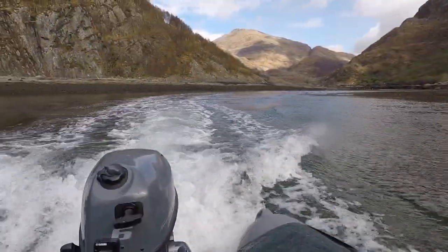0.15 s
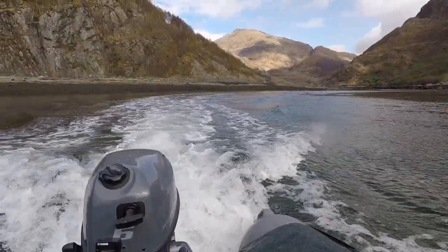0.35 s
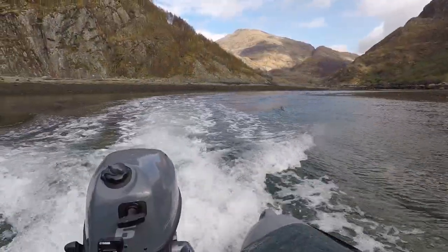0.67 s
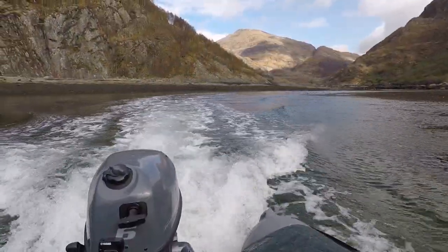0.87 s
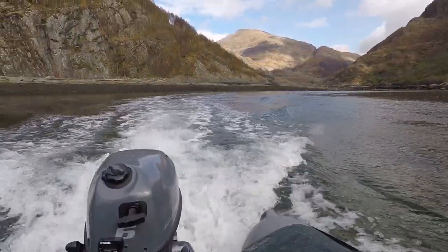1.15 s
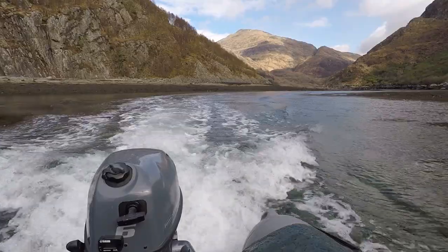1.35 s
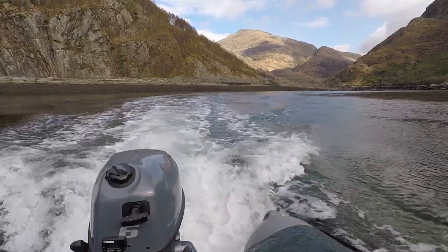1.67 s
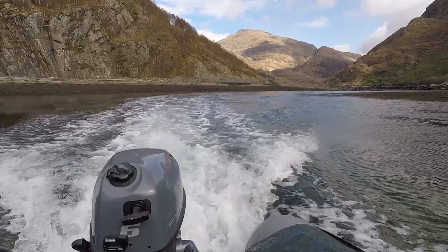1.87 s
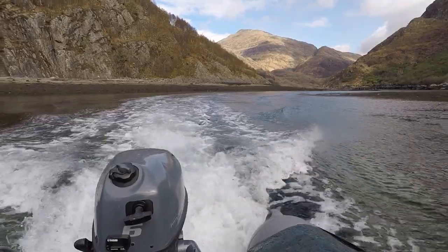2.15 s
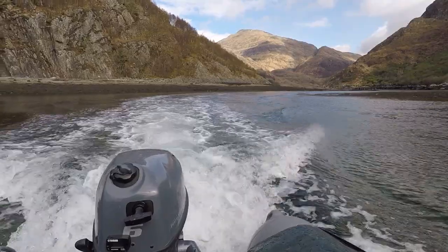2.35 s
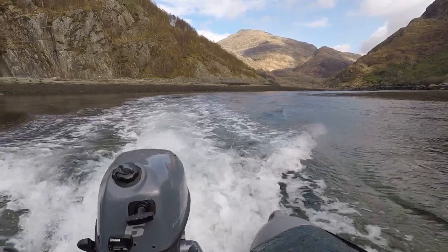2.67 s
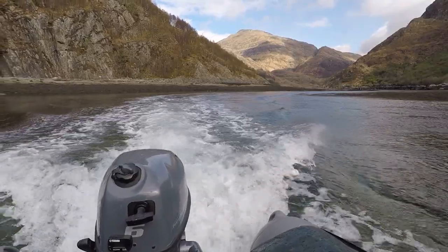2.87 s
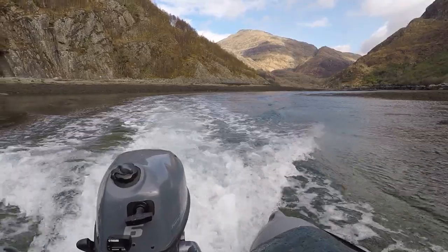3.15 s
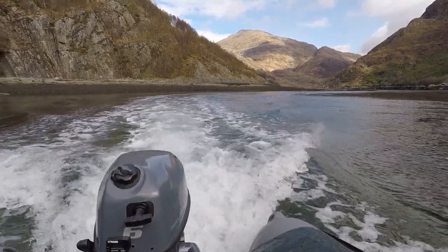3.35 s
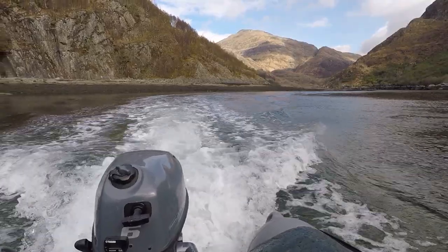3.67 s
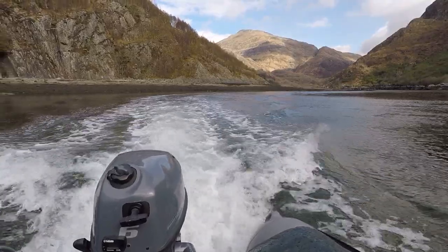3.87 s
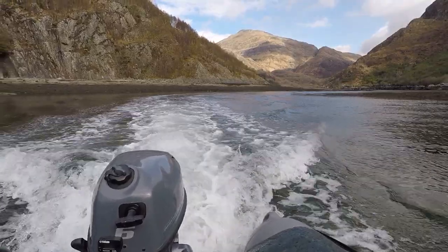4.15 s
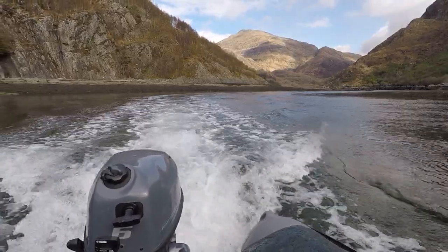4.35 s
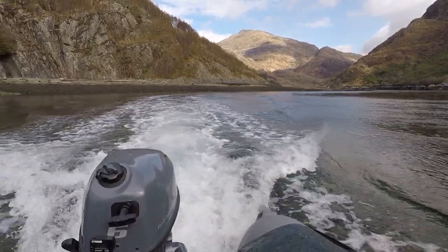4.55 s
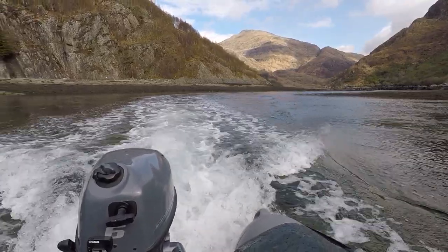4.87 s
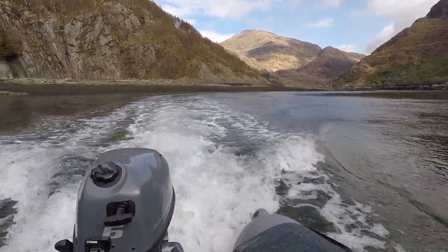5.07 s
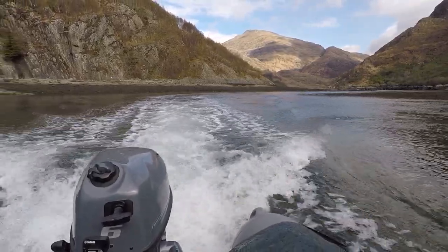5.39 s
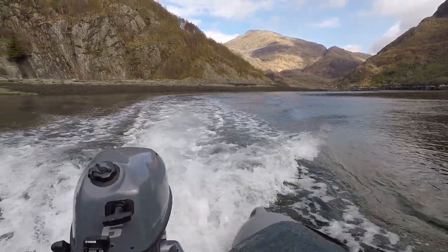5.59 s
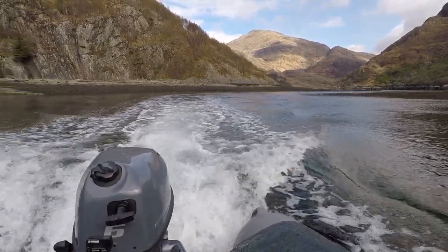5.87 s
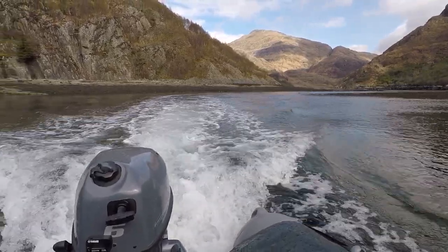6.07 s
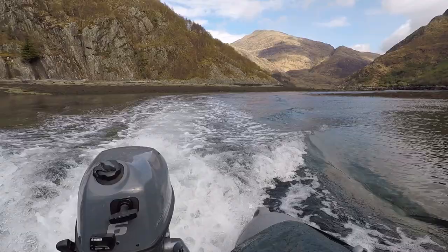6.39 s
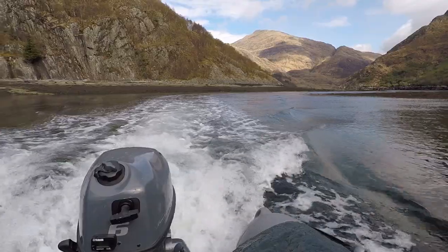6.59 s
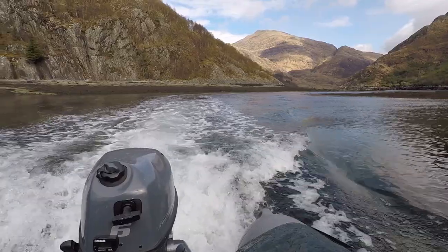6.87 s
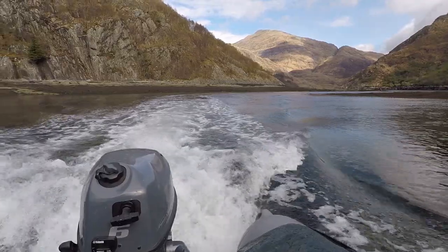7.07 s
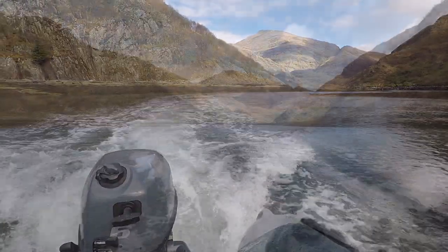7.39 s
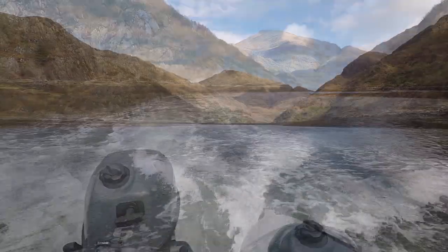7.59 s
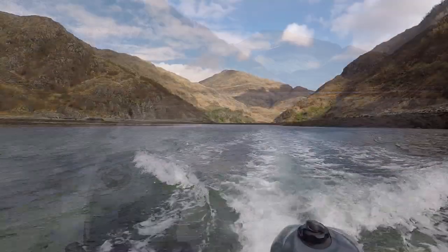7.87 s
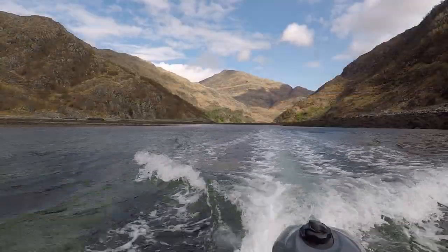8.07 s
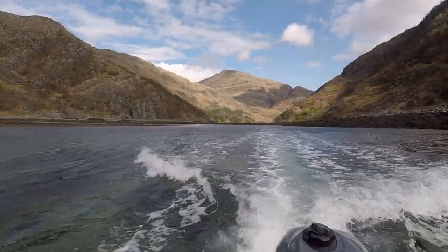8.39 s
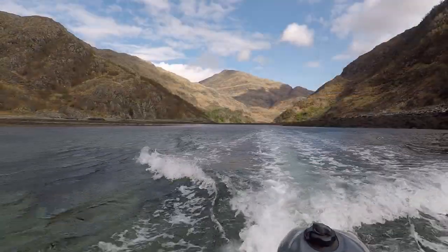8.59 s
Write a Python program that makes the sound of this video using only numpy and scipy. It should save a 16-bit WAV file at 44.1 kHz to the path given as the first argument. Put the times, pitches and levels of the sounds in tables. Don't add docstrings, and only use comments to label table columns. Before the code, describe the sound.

A small outboard motor drones steadily with a deep, rapid thump and cowl rattle over hissing wake, then blends into a faster, windier stretch.

```python
import sys
import numpy as np
from scipy import signal
from scipy.fft import rfft, irfft, next_fast_len
from scipy.io import wavfile
from scipy.ndimage import uniform_filter1d, minimum_filter1d

SR = 44100
rng = np.random.default_rng(int(sys.argv[2]) if len(sys.argv) > 2 else 0)


def log_audio(samples):
    frames = np.atleast_2d(samples).T
    limited = np.clip(frames, -1, 1)
    pcm = np.round(limited * 32767).astype(np.int16)
    wavfile.write(sys.argv[1], SR, pcm)


def invert_db(level):
    return 10 ** (np.asarray(level, dtype=float) / 20)


N = 385434


def noise():
    return rng.standard_normal(N)


def unit(x):
    return x / np.sqrt(np.mean(x ** 2))


def colour(x, spectrum):
    hz, db = np.transpose(spectrum)
    size = next_fast_len(N)
    log_hz = np.log(np.arange(size // 2 + 1) * SR / size + 1)
    gain = invert_db(np.interp(log_hz, np.log(hz), db))
    return unit(irfft(rfft(x, size) * gain, size)[:N])


def band(x, hz, width_hz):
    edges = np.clip([hz - width_hz / 2, hz + width_hz / 2], 2, SR / 2 - 100)
    return unit(signal.sosfilt(signal.butter(2, edges, "band", fs=SR, output="sos"), x))


def walk(rate):
    hold = int(SR / rate)
    held = np.repeat(rng.standard_normal(400), hold)[:N]
    return unit(uniform_filter1d(uniform_filter1d(held, hold), hold))


# t/s, hold/s, small eddies level/dB, large eddies level/dB
GUSTS = [(0.083, 0.35, -23, -15), (0.93, 0.37, -43, -26), (1.55, .22, -26, -15.5),
         (1.917, 0.21, -27, -16.5), (3.353, 0.61, -31, -18), (5.8, 0.42, -50, -19.5),
         (6.101, .7, -31.5, -22), (7.472, 0.071, -23.5, -15), (7.66, .14, -20, -17), (8.17, 0.25, -19, -20),
         (8.5, .3, -21, -15)]


def airflow(share):
    t = np.arange(N) / SR
    breeze_db, faster_breeze_db = [-32.5, -22], [-26, -18]
    rise_s, fall_s = 0.037, 0.1
    power = np.outer(invert_db(breeze_db), np.cos(share)) ** 2
    power = power + np.outer(invert_db(faster_breeze_db), np.sin(share)) ** 2
    for start, hold, small_db, large_db in GUSTS:
        corners = np.cumsum([-rise_s, rise_s, hold, fall_s])
        gust = np.interp(t - start, corners, [0, 1, 1, 0])
        power = power + np.outer([invert_db(small_db), invert_db(large_db)], gust) ** 2
    return np.sqrt(power)


# f/Hz, level/dB
BUFFET_TONE = [(60, -29), (120, -2.5), (170, -1.5), (230, -3), (300, -5), (400, -11.5), (470, -18.5),
               (570, -40), (800, -24.5), (1100, -41.5), (1500, -51), (2500, -70)]
# f/Hz, level/dB
RUMBLE_TONE = [(5, -40), (14, 0.5), (26, -1.5), (50, -3.5), (80, -6), (130, -9), (190, -14), (280, -29.5),
               (500, -80)]


def wind(share):
    small, large = airflow(share)
    buffet = colour(invert_db(1.5 * walk(30)) * noise(), BUFFET_TONE)
    rumble = colour(invert_db(1.8 * walk(7.4)) * noise(), RUMBLE_TONE)
    return small * buffet + large * rumble


# t/s, peak level/dB
SLAPS = [
    (7.47, -28),
    (7.9, -27),
    (7.764, -24),
    (8.303, -22),
    (8.389, -29),
    (8.439, -24),
]


def slaps():
    start, peak_db = np.array(SLAPS).T
    rise_s, decay_s = 0.0033, 0.013
    since = np.arange(N) / SR - start[:, None]
    shape = np.clip(since / rise_s, 0, 1) * np.exp(-np.clip(since, 0, 1) / decay_s)
    return (invert_db(peak_db - 7) @ shape) * band(noise(), 800, 330)


def wake(spectrum, patchy_db):
    lands = rng.random(N) < 900 / SR
    drops = lands * rng.standard_normal(N) * invert_db(2.2 * rng.exponential(size=N))
    foam, swell = 0, walk(5.5)
    for hz in 2200 * 2 ** np.arange(0, 3, 1 / 3):
        patch = band(noise(), hz, hz / 4) * np.sqrt(hz / 2200)
        foam = foam + patch * invert_db(patchy_db * walk(11) + .5 * patchy_db * swell)
    return colour(unit(foam) + invert_db(-17) * unit(drops), spectrum)


def ticks(cycle, table):
    out = 0
    for place, hz, width_hz, db in table:
        since = cycle - place
        strength = invert_db(1.5 * rng.standard_normal(400))[np.floor(since).astype(int) + 1]
        blow = strength * np.exp(-(since % 1) / .07)
        out = out + invert_db(db) * band(blow * noise(), hz, width_hz)
    return out


# f/Hz, width/Hz, depth of slow swell (0-1)
COWL_PANELS = [
    (820, 81, 0.3),
    (1490, 390, 0.27),
    (1910, 350, 0.11),
]


def clatter(cycle, spectrum, fresh, throb_db):
    steps, lowest_order = 256, 28
    order = np.arange(steps // 2 + 1)
    phases = np.exp(2j * np.pi * rng.random((2, len(order))))
    patterns = irfft(phases * (order > lowest_order), steps)
    place = cycle % 1 * steps
    first, second = (unit(np.interp(place, np.arange(steps), p, period=steps)) for p in patterns)
    turn = 0.59 * walk(3)
    pattern = np.cos(turn) * first + np.sin(turn) * second
    once, twice = np.cos(2 * np.pi * (cycle - .3)), np.cos(4 * np.pi * (cycle - .35))
    throb = invert_db(throb_db * (once + twice))
    rattle = colour(0.081 * pattern + fresh * throb * noise(), spectrum)
    panels = 0
    for hz, width_hz, depth in COWL_PANELS:
        panels = panels + depth * walk(1.625) * band(rattle, hz, width_hz) / 2
    return rattle + panels


def thump(cycle, orders, pulse, wobble_db):
    lead, turn, spread = pulse
    cowl_start = .75 * rng.random(50) - .38 * np.arange(50)
    out = 0
    for k, db in orders:
        if k < 15:
            start = turn - spread * (k - 8) ** 2 / 2 + (lead * k if k < 3 else 0)
        else:
            start = cowl_start[int(k)]
        loose = 5 if k == 1 else .6 if k < 5 else 1.2 if k < 15 else 1.5
        path = -.1 * (k == 1) - .085 * np.cos(2 * np.pi * k / 3 + .35) * (4 < k < 15)
        wander = path + .001 * k * walk(4)
        wobble = loose * (wobble_db * 1.25 * np.tanh(walk(5)) - .5) + .5
        out = out + invert_db(db + wobble) * np.cos(2 * np.pi * (k * cycle + start + wander))
    return np.sqrt(2) * out


def outboard(run, levels_db, orders, pulse, cowl, foam, valves, fresh):
    t, rate = np.transpose(run)
    hz = np.interp(np.arange(N) / SR, t, rate)
    thump_db, cowl_db, wake_db = levels_db
    labour_db = 3 * (hz - hz.mean())
    cycle = np.cumsum(hz * (1 + .001 * walk(9))) / SR
    body = invert_db(thump_db) * thump(cycle, orders, pulse, wobble_db=1.06)
    rattle = invert_db(cowl_db + labour_db) * clatter(cycle, cowl, fresh, throb_db=2.0)
    water = invert_db(wake_db) * (wake(foam, patchy_db=0.74) + ticks(cycle, valves))
    return body + rattle + water


# t/s, f/Hz
CRUISE_RUN = [(0.0, 36.18), (0.41, 36.06), (1.02, 36.2), (1.48, 36.2), (1.77, 35.6), (2.38, 36.2),
              (4.09, 36.27), (4.15, 35.98), (5.65, 36.15), (6.04, 35.58), (6.63, 36.2), (7.3, 36.15)]
# multiple of firing rate, level/dB
CRUISE_ORDERS = [(1, -8), (2, 0), (3, -5), (4, -2), (5, -17), (6, -7), (7, -14), (8, -13), (9, -13),
                 (10, -21), (11, -23), (12, -25), (13, -28), (14, -36), (15, -55), (16, -55), (17, -50),
                 (18, -47), (19, -45), (20, -40), (21, -32), (22, -31), (23, -40), (24, -35), (25, -39),
                 (26, -42), (27, -43), (28, -46), (36, -39), (44, -39)]
# f/Hz, level/dB (per Hz)
CRUISE_COWL = [(330, -54), (560, -17), (714, -11), (771, -3), (1080, -11), (1100, -19.5), (1260, -5.5),
               (1530, 0.5), (1660, -1), (1980, -1), (2300, -30), (2990, -50), (5060, -120)]
# f/Hz, level/dB (per Hz)
CRUISE_WAKE = [(1240, -26), (2100, -3.5), (2500, -1.5), (2690, -6.5), (3170, -2.5), (3500, -6.5),
               (4060, -1.5), (5280, -3.5), (6590, -2.5), (7970, -11), (9790, -11.5), (11300, -22),
               (13700, -26.5), (15000, -35)]
# place in the cycle (0-1), f/Hz, width/Hz, level/dB (over the wake)
CRUISE_TICKS = [
    (.86, 4150, 800, -11),
    (.12, 4200, 900, -15),
    (.88, 2800, 900, -17),
    (.9, 8500, 3500, -21),
]


def cruise():
    levels_db = (-16, -38, -39)
    pulse = (.305, .4, .012)
    return outboard(CRUISE_RUN, levels_db, CRUISE_ORDERS, pulse, CRUISE_COWL, CRUISE_WAKE,
                    CRUISE_TICKS, fresh=0.18)


# t/s, f/Hz
FASTER_RUN = [
    (7.9, 38.32),
    (8.314, 38.21),
    (8.74, 38.03),
]
# multiple of firing rate, level/dB
FASTER_ORDERS = [(1, -6), (2, 0), (3, -2), (4, -8), (5, -10), (6, -11), (7, -18), (8, -21), (9, -14),
                 (10, -13), (11, -16), (12, -31), (13, -36), (14, -41), (15, -48), (16, -40), (17, -39),
                 (18, -39), (19, -31), (20, -34), (21, -31), (22, -32), (23, -38), (24, -36), (25, -43),
                 (26, -38), (27, -44), (42, -38)]
# f/Hz, level/dB (per Hz)
FASTER_COWL = [(330, -43), (560, -19), (705, 3.5), (817, -9), (1020, -7), (1090, -27), (1250, -4.5),
               (1490, -9), (1560, -0.5), (1960, -6.5), (2300, -8.5), (2990, -48), (5060, -120)]
# f/Hz, level/dB (per Hz)
FASTER_WAKE = [(1240, -33), (2100, -10), (2340, -3), (2520, -6.5), (3410, -5.5), (3990, -8.5), (4480, -6),
               (5550, -9.5), (7650, -7.5), (8870, -13.5), (10500, -23.5), (12300, -28), (15000, -36)]
# place in the cycle (0-1), f/Hz, width/Hz, level/dB (over the wake)
FASTER_TICKS = [
    (.02, 4450, 350, -11.5),
    (.26, 4450, 350, -13),
    (.94, 6500, 1200, -16),
]


def faster():
    levels_db = (-16, -40, -41.5)
    pulse = (.45, .1, .13)
    return outboard(FASTER_RUN, levels_db, FASTER_ORDERS, pulse, FASTER_COWL, FASTER_WAKE,
                    FASTER_TICKS, fresh=0.19)


def scene():
    t = np.arange(N) / SR
    dissolve_s = (7.235, 8.12)
    share = np.interp(t, dissolve_s, [0, np.pi / 2])
    motor = np.cos(share) * cruise() + np.sin(share) * faster()
    fade_in_s, fade_from_db = 0.95, -6
    fade = invert_db(fade_from_db * np.clip(1 - t / fade_in_s, 0, 1))
    return (fade * (wind(share) + slaps() + motor))[None]


def roll_off(x):
    return signal.sosfilt(signal.butter(12, 15170, fs=SR, output="sos"), x)


def record(dry):
    bass = signal.sosfiltfilt(signal.butter(4, 560, fs=SR, output="sos"), dry)
    span = int(.03 * SR)
    peak = -minimum_filter1d(-np.abs(bass), span)
    peak = uniform_filter1d(uniform_filter1d(peak, span), span // 2)
    gain = np.minimum(1, (.68 / peak) ** .8)
    guarded = dry - bass * (1 - gain)
    to_edge = np.minimum(N - np.arange(N), np.arange(N))
    soft_ends = np.sin(np.pi / 2 * np.clip(to_edge / (.005 * SR), 0, 1)) ** 2
    return roll_off(guarded * soft_ends)


dry = scene()
out = record(dry)
log_audio(out)
```